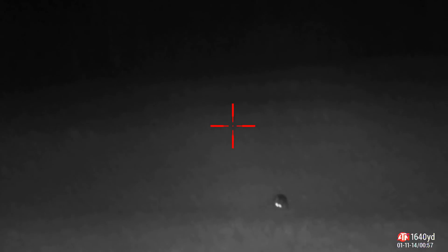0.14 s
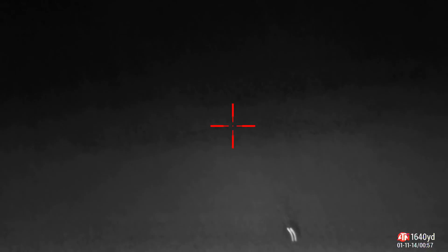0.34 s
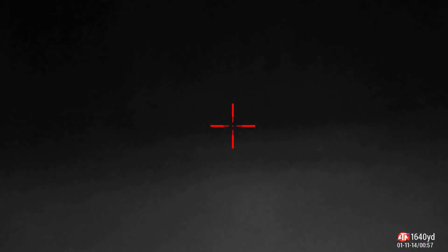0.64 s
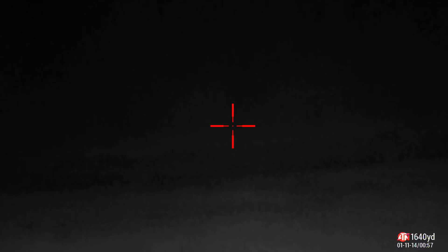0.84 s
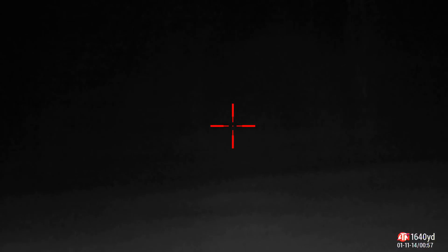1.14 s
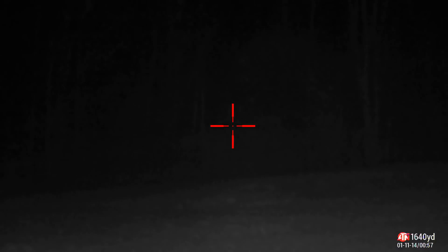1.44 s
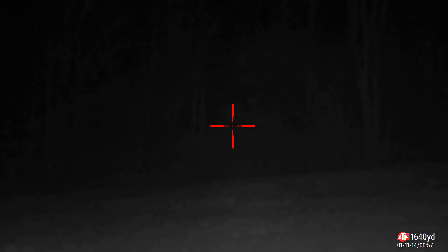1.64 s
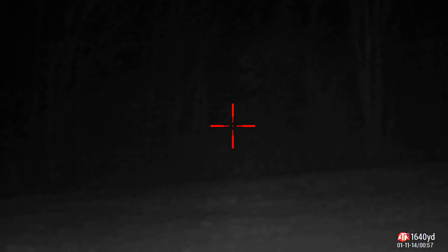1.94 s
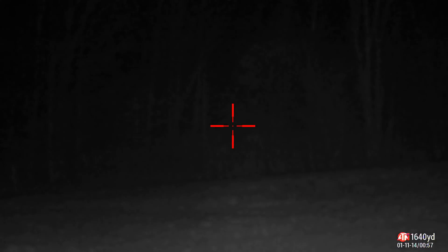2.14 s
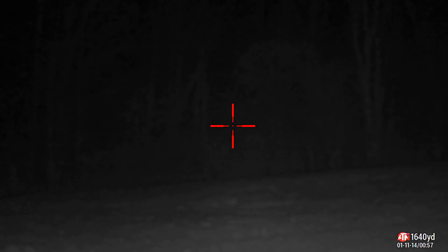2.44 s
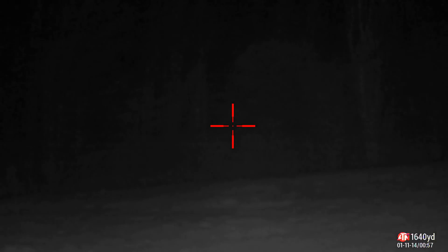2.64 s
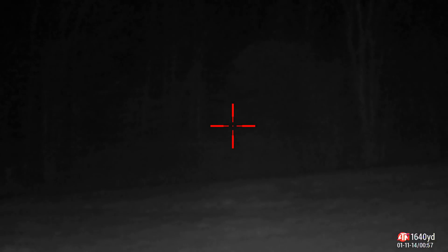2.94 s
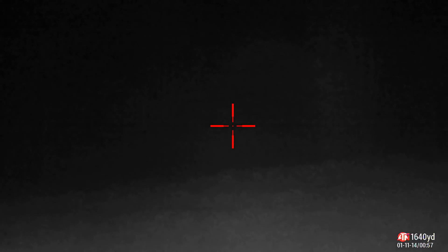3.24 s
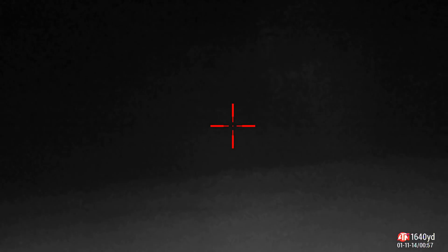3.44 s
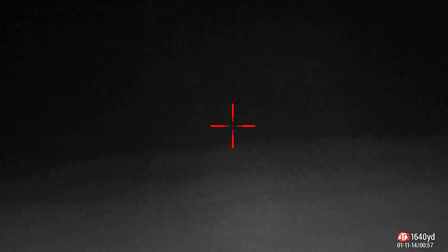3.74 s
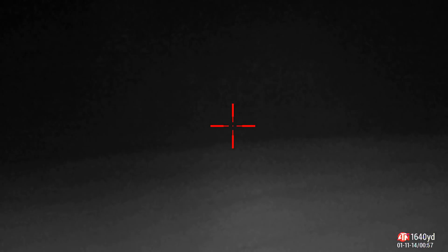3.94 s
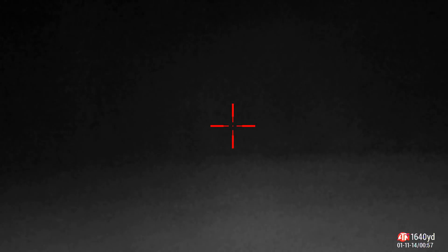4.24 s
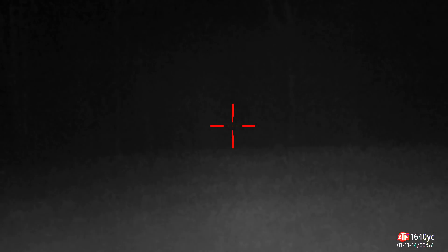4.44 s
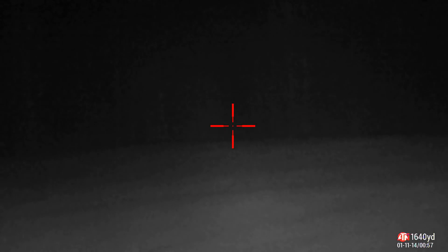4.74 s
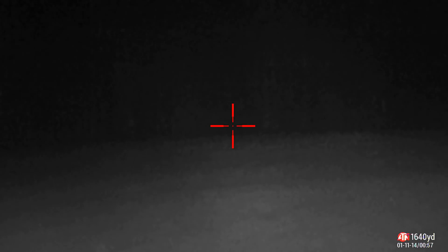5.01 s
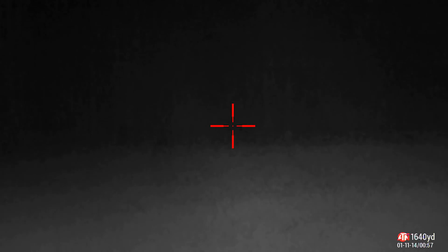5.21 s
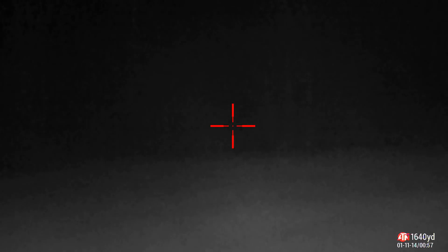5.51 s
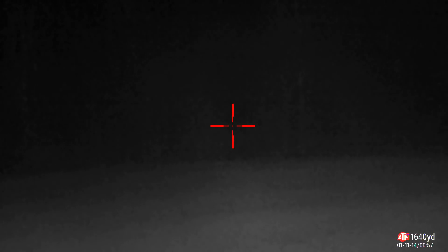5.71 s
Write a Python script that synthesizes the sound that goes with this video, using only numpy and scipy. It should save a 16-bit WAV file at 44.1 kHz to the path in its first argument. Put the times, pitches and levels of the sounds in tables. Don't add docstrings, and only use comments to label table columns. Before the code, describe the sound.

A quiet field at night, heard through a camera's own microphone: low far rumble, soft hiss and a thin, very high insect band. A rubber-bulb reed call is already squeaking at the start. Each squeak lasts about a tenth of a second, rising quickly to roughly 1.5 kHz and falling away, nasal and bright, often snapping into a harder edge at its peak, with tight short echoes. They come at about 0, 0.4, 0.8, 1.3, 1.7, 2.1, 2.5, 3.3, 3.7, 4.4 and 4.9 s; the one at 4.4 rises more slowly. Jacket cloth rustles from the beginning, strongest in the first second. Dull knocks on the camera body fall near 1.5, 3.5 and 4.8 s. Faint strap creaks chirp at 2.8, 4.0, 4.6 and 5.3 s. A metal catch snaps at 5.15 s with quick rebounds, then a cluster of soft thumps around 5.5 s and a last faint tick at 5.6 s.

```python
import sys
import numpy as np
from scipy import signal
from scipy.fft import rfft, irfft, next_fast_len
from scipy.io import wavfile
from scipy.ndimage import uniform_filter1d, map_coordinates

SR = 44100
rng = np.random.default_rng(int(sys.argv[2]) if len(sys.argv) > 2 else 0)


def log_audio(samples):
    frames = np.atleast_2d(samples).T
    limited = np.clip(frames, -1, 1)
    pcm = np.round(limited * 32767).astype(np.int16)
    wavfile.write(sys.argv[1], SR, pcm)


def gain_from_db(level_db):
    decades = np.asarray(level_db, float) / 20
    return 10 ** decades


N = 258867
LEAD = 2048


def unit(x):
    return x / np.sqrt(np.mean(x ** 2) + 1e-20)


def along(points, hz):
    f, v = np.transpose(points)
    return np.interp(np.log(hz + 1), np.log(f + 1), v)


def filtered(x, response):
    m = next_fast_len(len(x) + SR // 2)
    hz = np.fft.rfftfreq(m, 1 / SR)
    return irfft(rfft(x, m) * response(hz), m)[:len(x)]


def resonances(modes):
    def response(f):
        total = 0
        for k, (center, width, db) in enumerate(modes):
            mode = 1j * f * width / (center * center - f * f + 1j * f * width)
            total = total + (-1) ** k * gain_from_db(db) * mode
        return total
    return response


def wobble(rate):
    knots = rng.standard_normal(int(N * rate / SR) + 4)
    return map_coordinates(knots, [np.arange(N) * rate / SR])


def patchy(depth_db):
    z = signal.stft(rng.standard_normal(N), nperseg=512)[2]
    field = uniform_filter1d(rng.standard_normal(z.shape), size=6, axis=0)
    field = uniform_filter1d(field, size=8, axis=1)
    return signal.istft(z * gain_from_db(depth_db * unit(field)), nperseg=512)[1][:N]


# start_s, held_s, pitch_jump_hz, grip (0-1)
LOCKS = [
    (.033, 0.026, 72, 0.95),
    (0.422, 0.063, 84, 0.98),
    (.828, 0.043, 66, 1),
    (1.772, 0.041, 64.5, 0.95),
    (2.162, 0.074, 106, 0.91),
    (2.58, 0.065, 31.6, 0.99),
    (3.793, 0.022, 46, 0.66),
    (4.483, 0.052, 50.3, 1),
    (4.968, 0.041, 33.8, 0.95),
]


def barrel_lock(t, catch_s=0.0007, let_go_s=0.0026):
    def step(s, width):
        return 1 / (1 + np.exp(-np.clip(s / width, -50, 50)))

    held = np.array([step(t - s, catch_s) - step(t - s - hold, let_go_s) for s, hold, _, _ in LOCKS])
    jump_hz, grip = np.transpose(LOCKS)[2:]
    kick = sum(np.exp(-np.abs(t - s - 0.002) / 0.0023) for s, *_ in LOCKS)
    return np.clip(grip, 0, 1) @ held, jump_hz @ held, kick


def pitch_arch(s, t0, top, t1, top_hz, slow, speak_hz=1082):
    start_hz = 1113.6 - 2060 * slow_s if (slow_s := top - t0 - 0.06) else 1113.6
    rise_bend = 1.145 / slow ** 0.4
    fall_bend = 2.11 * max(slow, 1) ** 0.28
    up = top_hz - (top_hz - start_hz) * np.clip((top - s) / (top - t0), 0, 1) ** rise_bend
    down = top_hz - (top_hz - 991.7) * np.clip((s - top) / (t1 - top), 0, 1.2) ** fall_bend
    up = np.maximum(up, speak_hz + 0.13 * (up - speak_hz))
    return uniform_filter1d(np.where(s < top, up, down), size=220, mode="nearest")


# pitch_hz, t60_s
SCATTER_DECAY = [(500, 0.11), (3000, 0.063), (10000, 0.044)]
# pitch_hz, level_db
SCATTER_SHARE = [(800, -24), (2500, -15), (4500, -10), (8000, -4), (14000, -1)]


def scatter(x):
    hz, t, z = signal.stft(rng.standard_normal(SR // 10), SR, nperseg=128)
    decay = gain_from_db(-60 * t / along(SCATTER_DECAY, hz)[:, None])
    shape = decay / np.linalg.norm(decay, axis=1, keepdims=True)
    shape = shape * gain_from_db(along(SCATTER_SHARE, hz))[:, None]
    tail = signal.istft(z * shape, SR, nperseg=128)[1] / np.sqrt(128 / 2)
    return x + signal.fftconvolve(x, tail)[:len(x)]


# start_s, hardest_s, end_s, top_pitch_hz, level_db
SQUEEZES = [(-.02, .022, 0.11, 1458, -16.5), (0.378, 0.42, 0.51, 1532, -15.5),
            (0.782, 0.822, 0.92, 1521, -15.5), (1.332, 1.389, 1.4695, 1374, -16),
            (1.716, 1.765, 1.857, 1502, -13.5), (2.114, 2.158, 2.256, 1510, -13.5),
            (2.526, 2.586, 2.667, 1550, -12.5), (3.277, 3.315, 3.392, 1294, -15.5),
            (3.721, 3.78, 3.872, 1444, -14.5), (4.359, 4.488, 4.559, 1424, -15.5),
            (4.91, 4.97, 5.042, 1504, -15)]
# free_db, locked_to_barrel_db
HARMONICS = [(1.5, 3), (-1.5, 3.5), (-0.5, -2), (-2, -4.5), (-4.5, -9), (-8, -10), (-10.5, -14.5),
             (-11.5, -14), (-14.5, -18), (-17.5, -23), (-21, -30), (-26, -21.5), (-26, -32)]
# pitch_hz, width_hz, level_db
BARREL = [(1360, 2720, -2.5), (3220, 330, 5.5), (3505, 118, 10.5), (4410, 400, 5), (5780, 283, 1),
          (8840, 2050, -11.5), (9690, 640, -11.5), (13500, 1250, -22)]
# time_s, treble_db
AIM = [(0, 0), (.9, 0), (1.4, -1.5), (2.2, -2), (3.3, 0), (4.5, 2), (5, 1)]


def reed(chirp_hz=260, jitter_hz=4, db_per_octave=9, air_db=-28, rasp_db=0.6157, bright_db=3, kick_db=5,
         leak_db=-37, leak_hz=6000, sag_hz_per_s=8500):
    t = np.arange(-LEAD, N) / SR
    out, leak = np.zeros(N + LEAD), np.zeros(N + LEAD)
    shake = np.pad(wobble(160), (LEAD, 0))
    air = rng.standard_normal(N + LEAD)
    rasp = np.pad(wobble(500), (LEAD, 0))
    locked, jump_hz, kick = barrel_lock(t)
    for t0, top, t1, top_hz, db in SQUEEZES:
        on = (t > t0) & (t < t1 + 0.09)
        where = np.flatnonzero(on)
        s, lock = t[on], locked[on]
        aim_db = np.interp(top, *np.transpose(AIM))
        slow = (top - t0) / 0.06
        dying = np.maximum(s - t1 + 0.007, 0)

        hz = pitch_arch(s, t0, top, t1, top_hz, slow) + jump_hz[on]
        hz = hz - chirp_hz * np.exp(-(s - t0) / 0.00159) + jitter_hz * shake[on]
        hz = hz - sag_hz_per_s * np.minimum(dying, 0.02)
        phase = 2 * np.pi * np.cumsum(hz) / SR

        opening = 1 - np.exp(-(s - t0) / (0.0017 * max(slow, 1) ** 2.86))
        puffs = air[on] * (1 + np.cos(phase))
        tone = gain_from_db(air_db - 1600 * dying) * puffs
        for k, (free_db, lock_db) in enumerate(HARMONICS):
            flip = -1 if k == 1 else 1
            lock_kick_db = kick_db * kick[on] * (k == 1)
            size = gain_from_db(free_db) * (1 - lock) + flip * gain_from_db(lock_db + lock_kick_db) * lock
            flutter_db = rasp_db * max(k - 2, 0) * rasp[where - 97 * k]
            size = size * gain_from_db(flutter_db + aim_db * np.clip((k - 2) / 3, 0, 1))
            size = size * gain_from_db(bright_db * min(k, 2) * (k != 1) * np.log2(hz / 1500))
            size = size * gain_from_db(-(1468 + 40 * k) * dying) * opening ** (0.5 * min(k, 2))
            size = size * ((k + 1) * hz < SR / 2)
            tone = tone + size * np.cos((k + 1) * phase)

        octaves = np.log2(hz / top_hz)
        onset = 1 - np.exp(-(s - t0) / 0.0001)
        out[on] += scatter(gain_from_db(db - 4.0 + db_per_octave * octaves) * onset * tone)
        leak[on] = gain_from_db(db + aim_db + leak_db - 1500 * dying + 12 * octaves) * opening * puffs

    def leak_band(f):
        return 1 / (1 + (leak_hz / (f + 1)) ** 6) / (1 + (f / leak_hz / 2) ** 2)

    return filtered(out, resonances(BARREL)) + filtered(leak, leak_band)


# delay_ms, level_db, lowest_hz, highest_hz
ECHOES = [
    (5.39, -.3, 800, 1580),
    (5.86, -8, 1900, 3100),
    (2.45, -9, 3400, 5200),
]


def echoes(x):
    def comb(f):
        total = 1
        for ms, db, low, high in ECHOES:
            band = 1 / (1 + (low / (f + 1)) ** 8) / (1 + (f / high) ** 24)
            total = total + gain_from_db(db) * band * np.exp(-2j * np.pi * f * ms / 1000)
        return total
    return filtered(x, comb)[LEAD:]


# pitch_hz, level_db (per Hz)
NIGHT = [(25, -34), (200, -13), (330, -5), (700, -3.5), (1200, -10.5), (4300, -12.5), (7000, -19.5),
         (15400, -25)]


def night(level_db=-50, insects_hz=13650, insects_wide_hz=480, insects_db=8.5):
    def color(f):
        insects = insects_db * np.exp(-((f - insects_hz) / insects_wide_hz) ** 2)
        return gain_from_db(along(NIGHT, f) + insects)
    return gain_from_db(level_db - 1.5) * unit(filtered(patchy(depth_db=1.7), color))


# middle_s, length_s, rustle_db, low_swish_db
RUBS = [(0.152, 0.034, -42, -58), (0.437, 0.19, -40.5, -53), (.86, 0.37, -44.5, -51.5),
        (1.23, 0.15, -68, -53.5), (1.926, 0.12, -58, -64), (2.29, 0.11, -63, -67), (2.75, 0.25, -55, -89),
        (3.194, 0.19, -52, -60), (3.663, 0.3, -50.5, -57), (3.997, 0.062, -60.5, -53.5),
        (4.44, 0.16, -45.5, -51.5), (4.664, 0.12, -64, -50), (4.9, 0.15, -57, -79),
        (5.372, 0.074, -53, -73), (5.5, 0.2, -56.5, -55.5)]
# pitch_hz, width_hz, level_db
CLOTH = [(1800, 900, -5), (2900, 1200, -6.5), (4400, 750, 0), (6000, 1200, -6.5), (7600, 2500, -12)]


def jacket(rustle_db=3.0, swish_db=1.5, edge_db=6, squareness=1.53, idle_rustle_db=-80.5, idle_swish_db=-60):
    middle, length, rub_db, sway_db = np.transpose(RUBS)
    t = np.arange(0, N / SR + 0.002, 0.002)
    swell = gain_from_db(-edge_db * np.abs(2 * (t[:, None] - middle) / length) ** squareness)
    grain = gain_from_db(0.8 * wobble(45) + 1.3 * wobble(400))
    weave, body = resonances(CLOTH), resonances([(650, 1000, 0)])
    rustle = unit(filtered(grain * patchy(depth_db=-2.4), lambda f: weave(f) ** 2))
    swish = unit(filtered(patchy(depth_db=2.5), lambda f: body(f) ** 2))
    now = np.arange(N) / SR
    rub = np.interp(now, t, swell @ gain_from_db(rub_db) + gain_from_db(idle_rustle_db))
    sway = np.interp(now, t, swell @ gain_from_db(sway_db) + gain_from_db(idle_swish_db))
    return gain_from_db(rustle_db) * rub * rustle + gain_from_db(swish_db) * sway * swish


# time_s, peak_db, pitch_hz
BUMPS = [(1.544, -31, 240), (2.779, -44, 296), (3.485, -30, 190), (3.51, -34, 260), (3.912, -57, 358.4),
         (3.982, -39, 295), (4.045, -55, 244), (4.822, -40, 188), (5.269, -45, 102), (5.357, -33, 173),
         (5.459, -39, 167), (5.475, -30, 200), (5.492, -29, 178), (5.512, -26.5, 284), (5.544, -38, 143),
         (5.576, -37.5, 173)]


def bumps():
    out, t = np.zeros(N + SR), np.arange(SR // 10) / SR
    for s, db, hz in BUMPS:
        press = (1 - np.exp(-t / 0.002)) ** 2
        knock = gain_from_db(db + 7.0 - 60 * t / 0.027) * press * np.sin(2 * np.pi * hz * t)
        out[round(s * SR):][:len(t)] += knock
    return out[:N]


# time_s, peak_db, start_hz, end_hz, length_s
CREAKS = [
    (2.776, -44, 1183, 1185, 0.012),
    (3.975, -45, 1910, 2930, 0.024),
    (4.628, -48, 1192, 1400, .04),
    (5.335, -46.5, 1798, 1724, 0.056),
]


def creaks():
    out = np.zeros(N)
    for s, db, hz0, hz1, length in CREAKS:
        n = round(length * SR)
        rough = uniform_filter1d(rng.standard_normal(n), size=60)
        tone = np.sin(2 * np.pi * np.cumsum(np.linspace(hz0, hz1, n)) / SR)
        out[round(s * SR):][:n] += gain_from_db(db) * np.hanning(n) * (1 + 0.8 * unit(rough)) * tone
    return out


# time_s, peak_db, low_ring_db
TICKS = [
    (4.795, -43, -12),
    (5.15, -21, -19),
    (5.1687, -27, -20),
    (5.2207, -27, -12),
    (5.635, -40, -8),
]
# pitch_hz, t60_s
CATCH_MODES = [(800, .008), (1800, .009), (3100, .01), (4300, .014), (6500, .0022)]


def ticks(dull_hz=5000, edge_db=20):
    out, t = np.zeros(N + SR), np.arange(SR // 20) / SR
    for s, db, low_db in TICKS:
        ring = 0
        for hz, t60 in CATCH_MODES:
            mode_db = (low_db + 15.0) * (hz < 2500) + rng.normal(0, 2.4)
            ring = ring + gain_from_db(mode_db - 60 * t / t60) * np.sin(2 * np.pi * hz * t)
        u = t / 0.00007
        edge = -gain_from_db(edge_db) * (1 - u) * np.exp(-u)
        out[round(s * SR):][:len(t)] += gain_from_db(db - 13.5) * (ring + edge)

    def glove(f):
        return 1 / (1 + 1.2j * f / dull_hz - (f / dull_hz) ** 2) ** 2
    return filtered(out[:N], glove)


def scene():
    call = echoes(reed())
    handling = jacket() + bumps() + creaks() + ticks()
    return (call + night() + handling)[None]


def band_limit(x):
    return signal.sosfilt(signal.butter(12, 15440, fs=SR, output="sos"), x)


def record(dry):
    bent = dry[0] + 0.033 * dry[0] ** 2

    def band(f):
        return 1j * f / (60 + 1j * f) / (1 + (f / 15300) ** 120)
    return band_limit(filtered(bent, band)[None])


dry = scene()
out = record(dry)
log_audio(out)
```